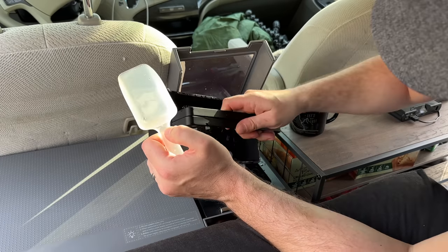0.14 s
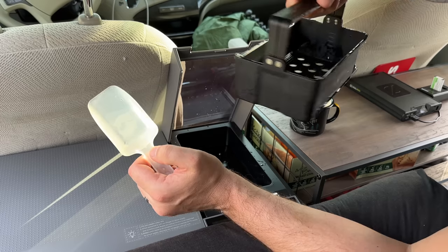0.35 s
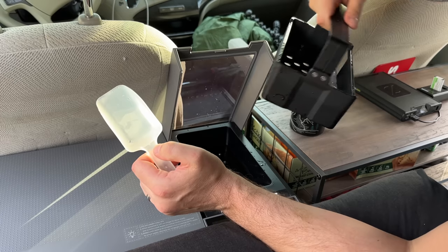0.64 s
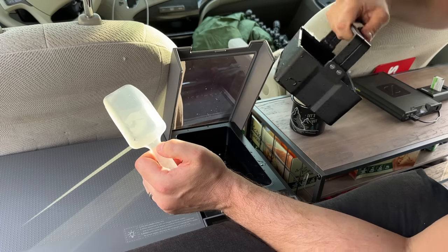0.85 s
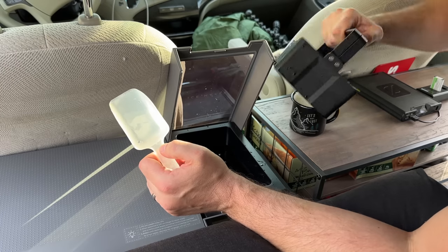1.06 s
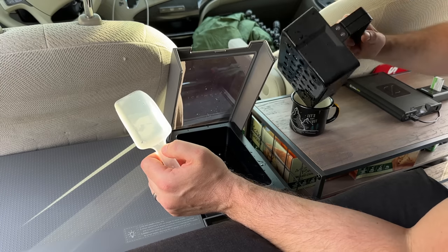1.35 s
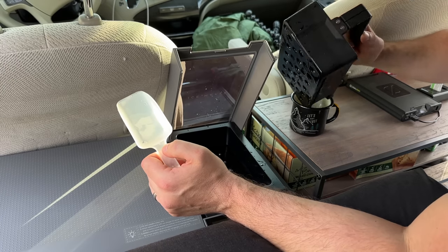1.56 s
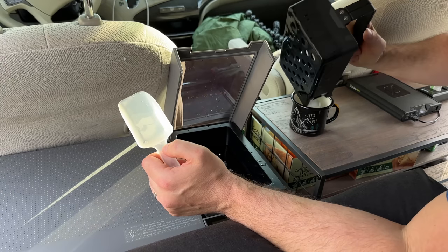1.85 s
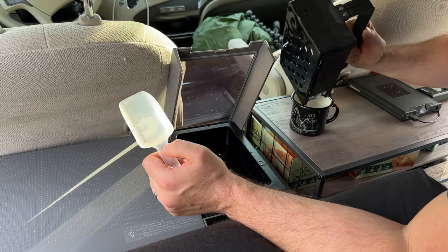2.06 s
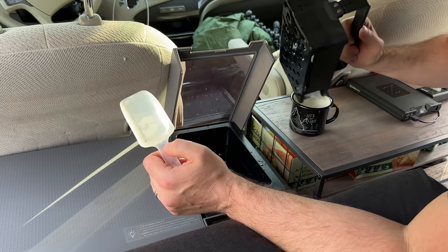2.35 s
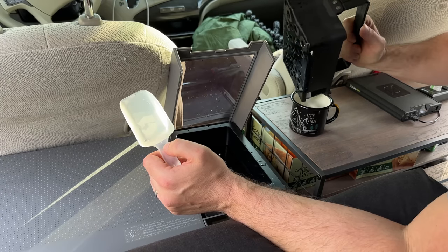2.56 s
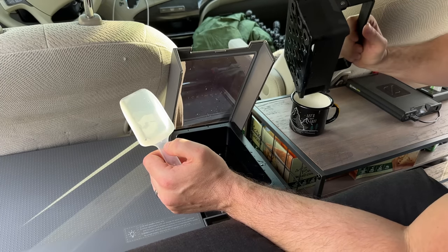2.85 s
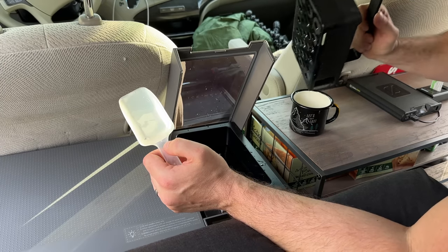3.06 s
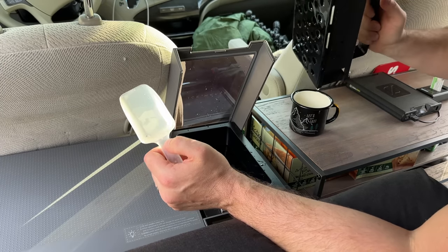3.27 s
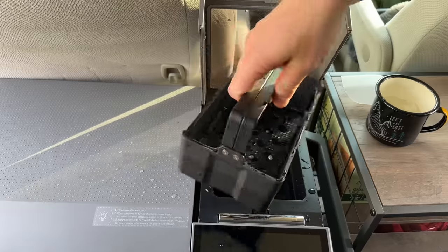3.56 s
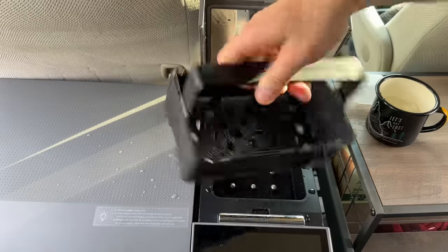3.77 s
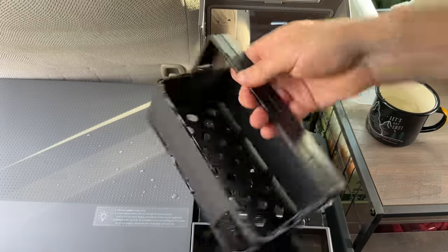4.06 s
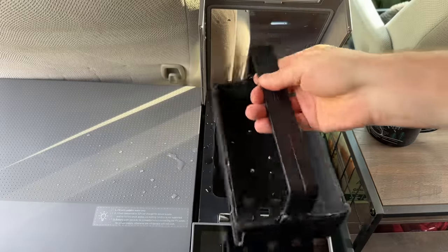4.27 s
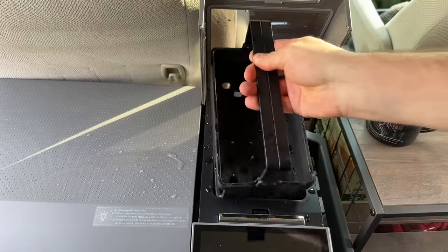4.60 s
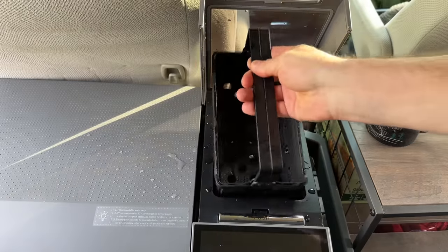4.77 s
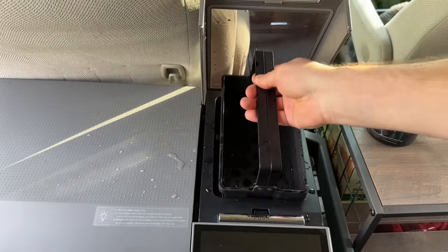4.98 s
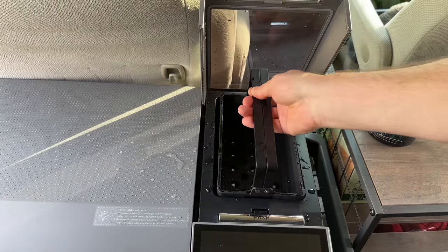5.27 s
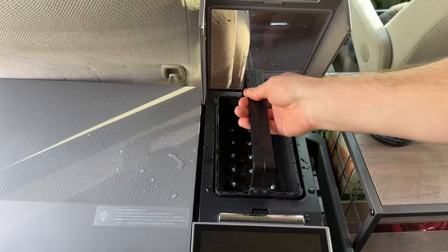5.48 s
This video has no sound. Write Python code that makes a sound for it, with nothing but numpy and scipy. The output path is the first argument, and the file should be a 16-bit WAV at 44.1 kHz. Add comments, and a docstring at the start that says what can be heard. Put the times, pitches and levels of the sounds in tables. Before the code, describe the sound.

Inside a small camper, close and dry, over a faint wavering hush, low hum and fine hiss. From 0 to 0.35 seconds ice cubes rattle and scrape in a plastic basket as it comes free with a soft thud; one more clack follows at 0.5. Low rumbling bumps jostle the microphone from 0.3 to 0.9, strongest near 0.85, with thin whistling in the hiss. Light shifts and a plastic tap come around 1.1. From 1.3 ice pours into a metal mug: dense, crunchy, bright clatter, loudest at 1.45 to 1.9, with a brief rim ring and short rising watery plops. It thins after 2.0, with a smaller tumble at 2.4 to 2.8. A quiet, faintly whistling hiss follows. At 3.7 the empty basket gives a sharp double clack; from 4.5 to 5.1 hollow knocks and a short rub settle it in its housing, then soft taps and a faint rustle end it.

```python
"""In a small camper, a plastic basket is lifted out of an ice maker and tipped over a metal mug.
Cubes shift, tumble and plop: contact noise is filtered by resonances, and trapped air rings as rising sines.
The empty basket then knocks its way back into the housing and sounds the ice maker's panels as damped sines.
Movement jostles the microphone in low bursts, over a faint hush of shaped noise, a low hum and a fine,
at times whistling hiss."""
import sys
import numpy as np
from scipy import signal
from scipy.fft import rfft, irfft
from scipy.io import wavfile
from scipy.ndimage import uniform_filter1d, minimum_filter1d

SR = 44100
rng = np.random.default_rng(int(sys.argv[2]) if len(sys.argv) > 2 else 0)


def unload_wav(signal):
    """Save mono or channel-first audio to the path in sys.argv[1] as 16-bit WAV at rate SR, clipped to [-1, 1]."""
    wavfile.write(
        sys.argv[1],
        SR,
        np.round(np.clip(np.atleast_2d(signal).T, -1, 1) * 32767).astype(np.int16),
    )


N = 248724
TIME = np.arange(N) / SR  # [s]

# cubes landing in the mug and on each other: (time [s], body level [dB], clack level [dB], tick level [dB])
DROPS = [(1.28, -23.5, -28, -39), (1.2858, -22.5, -28, -50), (1.3244, -30.5, -34, -40),
         (1.3582, -24.5, -29, -38), (1.4027, -17.5, -29.5, -35), (1.4116, -28, -25, -22),
         (1.4217, -20.5, -21.5, -34), (1.4312, -25, -42, -34), (1.4534, -11.5, -16, -18.5),
         (1.4738, -18.5, -22, -36), (1.5448, -20, -27, -39), (1.5832, -22, -21, -22),
         (1.5955, -16.5, -29, -35), (1.6191, -34, -39, -32), (1.6393, -16, -26, -26),
         (1.6615, -16.5, -23.5, -22.5), (1.6801, -19, -25.5, -33), (1.6959, -21, -40.5, -32),
         (1.7139, -23, -21.5, -29), (1.7407, -20.5, -29, -33.5), (1.7569, -34, -28, -35),
         (1.798, -19.5, -23.5, -37), (1.8204, -19, -21.5, -35), (1.8411, -23, -30, -27),
         (1.8507, -11, -12.5, -15.5), (1.9176, -25.5, -34.5, -49), (1.9336, -34, -39, -39),
         (2.0107, -19, -26.5, -28.5), (2.0422, -23.5, -23.5, -32), (2.152, -56, -42, -31),
         (2.1673, -24.5, -35, -41), (2.1946, -34, -30, -36.5), (2.2238, -33, -36.5, -56),
         (2.4014, -40, -33, -26), (2.4444, -25.5, -21.5, -30.5), (2.5314, -28.5, -28, -22.5),
         (2.5623, -21.5, -33, -23), (2.5663, -24.5, -22.5, -32), (2.5898, -25.5, -24.5, -28),
         (2.6083, -41, -26.5, -36), (2.6232, -31, -26, -37), (2.6926, -28, -25.5, -28.5),
         (2.7277, -27.5, -23, -33), (2.7343, -34, -22, -32), (2.8029, -45, -36, -44),
         (2.8203, -50, -33.5, -39.5)]
# cubes shifting in the basket: (time [s], body level [dB], clack level [dB], tick level [dB])
SHIFTS = [(0.0268, -23.5, -27.5, -35.5), (0.0572, -22.5, -28, -36), (0.0715, -24, -25.5, -39),
          (0.0793, -17.5, -19.5, -23.5), (0.0843, -25, -45, -28.5), (0.11, -21, -23, -47),
          (0.1837, -17.5, -23.5, -36), (0.2082, -21, -23, -36), (0.2152, -24, -33, -22),
          (0.3004, -24.5, -30, -42), (0.3431, -29, -31.5, -52), (0.5059, -24, -24, -30),
          (1.0597, -33.5, -46, -44.5), (1.1242, -33, -36, -42), (1.1829, -38, -46, -41.5),
          (1.2158, -30, -33.5, -47)]
# edges of the body, clack and tick bands of ice: (frequency [Hz])
ICE_BANDS_HZ = [700, 2200, 6000, 17000]
# strength of the ice sliding into the mug, before offsets: (time [s], body level [dB], clack level [dB])
POUR = [(1.25, -39, -56), (1.32, -34, -42), (1.39, -22.5, -39), (1.44, -52, -32), (1.51, -22.5, -36.5),
        (1.57, -24, -29.5), (1.6, -12, -20.5), (1.68, -19.5, -27.5), (1.76, -17.5, -26.5), (1.83, -28, -31),
        (1.89, -25, -34), (1.97, -39, -49), (2.06, -39, -45), (2.21, -37.5, -51), (2.37, -45, -59),
        (2.43, -30.5, -43), (2.51, -26.5, -34), (2.6, -42, -59), (2.68, -58, -70), (2.75, -35, -39),
        (2.85, -45, -49)]
# strength of the ice sliding in the basket, before offsets: (time [s], body level [dB], clack level [dB])
SCRAPE = [(0, -19, -34.5), (0.05, -26, -41), (0.1, -23, -29), (0.15, -23, -38), (0.2, -26, -37.5),
          (0.24, -38, -70), (0.38, -39, -52)]
# mean resonances of the mug: (frequency [Hz], width [Hz], level over the plain contact sound [dB])
MUG = [(1290, 57, 12), (1620, 51, 17.5), (1780, 54, 11.5), (1920, 110, 9.5), (2710, 200, 17.5),
       (3350, 400, 13), (10040, 880, 21.5), (13400, 1900, 13)]
# the mug's hollow, retuned and damped as ice gathers in it:
# (time [s], frequency [Hz], width [Hz], level over the plain contact sound [dB])
MUG_HOLLOW = [(1.9, 1072, 36, 22), (2.42, 1330, 45, 18), (2.66, 1100, 45, 13)]
# mean resonances of the basket: (frequency [Hz], width [Hz], level over the plain contact sound [dB])
BASKET = [(706, 150, 12), (1260, 98, 10.3), (1437, 59, 18), (1638, 140, 19), (3040, 930, 14.6),
          (9800, 740, 16), (13300, 1900, 6.1)]
# cubes that catch the rim: (time [s], level [dB])
RIM_HITS = [(1.585, -14.5), (1.674, -32)]
# ringing modes of the rim: (frequency [Hz], level relative to the hit [dB], 60 dB decay time [s])
RIM_MODES = [(5716, 0, .1), (5918, -1, .13), (6146, -3, .13), (6266, -5, .1), (13030, -6, .06)]
# air pockets in the wet bottom of the mug:
# (time [s], starting frequency [Hz], relative level [dB], 60 dB decay time [s], relative pitch rise [1/s])
PLOPS = [(1.409, 1040, -17, .06, 2), (1.546, 970, -17, .07, 5), (1.596, 990, -15, .06, 6),
         (1.641, 1010, -10, .06, 4), (1.663, 1040, -14, .07, 2), (1.887, 1020, -19, .07, 4),
         (2.080, 800, -33, .16, 10), (2.226, 1620, -26, .07, 1), (2.406, 1340, -25, .1, 2),
         (2.445, 2900, -19, .04, 2), (2.607, 1000, -15, .08, 14), (2.639, 940, -21, .11, 16),
         (2.755, 970, -25, .1, 8)]
# the basket bumping the mug and the housing:
# (time [s], thud level [dB], hollow level [dB], clack level [dB], tick level [dB])
KNOCKS = [(1.114, -33, -29, -23, -41), (2.2716, -31.5, -25.5, -18, -40.5),
          (3.6933, -23.5, -25, -16.5, -17.5), (3.7167, -20, -21.5, -19.5, -24),
          (3.7454, -30.5, -36, -32, -41), (4.5083, -30, -20.5, -26.5, -51), (4.6715, -24.5, -19, -17, -28),
          (4.7096, -18.5, -22, -20, -32), (4.7477, -25.5, -25.5, -29, -42), (4.7733, -28, -22, -26.5, -48),
          (4.8406, -18, -19, -17, -28.5), (4.89, -28, -28, -27, -48), (4.904, -24, -10.5, -19.5, -37.5),
          (4.9572, -34.5, -34, -36, -34), (5.0012, -32, -31, -40, -53), (5.0389, -27.5, -22.5, -34.5, -44),
          (5.089, -40, -29.5, -46, -53), (5.294, -34.5, -23.5, -29.5, -41), (5.3779, -36, -32, -34, -44.5),
          (5.5667, -31, -30.5, -32.5, -43.5)]
# edges of the thud, hollow, clack and tick bands of a knock: (frequency [Hz])
KNOCK_BANDS_HZ = [130, 450, 900, 2600, 17000]
# the basket's side rubbing down the housing, before offsets: (time [s], body level [dB], clack level [dB])
RUB = [(4.848, -34, -20.5), (4.875, -21, -37), (4.902, -35, -42)]
# mean resonances of the housing: (frequency [Hz], width [Hz], level over the plain contact sound [dB])
HOUSING = [(150, 26, 16), (235, 75, 22.2), (374, 98, 8.9), (591, 53, 21.3), (702, 79, 15.8),
           (1120, 220, 9.6), (1477, 22, 11), (1757, 54, 10.2), (2124, 42, 4.6), (3170, 86, 2.6),
           (10100, 990, 15.4), (13300, 2200, 10.8)]
# the basket coming free of its seat: (time [s], thud level [dB], hollow level [dB])
RELEASE = (0.075, -23, -32)
# mean modes of the ice maker's panels: (frequency [Hz], level relative to the blow [dB], 60 dB decay time [s])
PANELS = [(159.6, -7.5, 0.21), (246.4, 4, 0.14), (363.6, -10.5, 0.21), (610, -6, 0.056), (1146, -4.5, 0.04)]
# the hand shifting its grip on the basket, one list a stroke, before offsets:
# (time [s], body level [dB], clack level [dB])
GRIPS = [
    [(3.385, -53, -59), (3.42, -52, -47.5), (3.47, -57, -66)],
    [(5.3, -56, -58), (5.345, -54, -45), (5.39, -58, -60)],
    [(5.55, -41, -59), (5.6, -50, -50), (5.64, -43, -43)],
]
# low swings and case rattles that make up the jolts of the microphone:
# (time [s], frequency [Hz], relative level [dB])
JOLTS = [(0.305, 69, -15), (.456, 73, -11), (.483, 93, -14), (0.511, 316, -17.5), (.521, 98, -12),
         (0.534, 80.6, -11), (0.607, 69.6, -14.5), (0.714, 66, -15.5), (0.764, 240, -26.5),
         (.769, 101, -13.5), (0.804, 70, -11.5), (.822, 358, -18), (0.829, 184, -6.5), (0.844, 95, -4),
         (.849, 227, -12), (0.894, 82.5, -11), (3.428, 47.7, -20), (3.878, 58.5, -21), (4.62, 66, -16),
         (5.406, 51.4, -15.5)]
# the rumble between jolts, before its ceiling and offset: (time [s], level [dB])
SWAY = [(0.0, -37.5), (0.16, -32.5), (0.3, -12), (0.38, -20.5), (0.52, -15), (0.66, -20), (0.85, -4),
        (0.99, -26.5), (1.07, -22), (1.27, -55), (1.95, -72), (2.42, -25), (2.48, -41.5), (3.35, -35.5),
        (3.53, -29), (3.71, -23.5), (3.8, -30.5), (4.19, -28.5), (4.24, -38), (4.55, -30), (4.62, -22.5),
        (4.74, -31), (5.34, -27.5), (5.4, -18.5), (5.56, -32), (5.64, -21)]
# spectrum of that rumble: (frequency [Hz], relative level [dB])
SWAY_COLOUR = [(12, -40), (20, -18), (44, -10.5), (70, -4), (93, -12), (211, -26.5), (390, -51),
               (660, -120)]
# a fine hiss, probably refrigerant in the tubing, before its wavering: (time [s], level [dB])
HISS = [(.78, -57.5), (.88, -66), (1.05, -57.5), (3.55, -54), (4.4, -59.5), (5.1, -52.5)]
# spectrum of the hiss: (frequency [Hz], relative level [dB])
HISS_COLOUR = [(3500, -3), (9800, 0), (14500, -7)]
# thin whistles in the hiss, one list each, before flicker: (time [s], frequency [Hz], level [dB])
WHISTLES = [
    [(.66, 8800, -66), (.71, 9250, -56), (.77, 8680, -57), (.825, 9800, -49), (.88, 8700, -66),
     (.932, 9600, -61), (.99, 8450, -68)],
    [(2.82, 10600, -55), (2.92, 9200, -64), (3.05, 10050, -53), (3.22, 8450, -63), (3.33, 9080, -58),
     (3.385, 7950, -66)],
    [(4.96, 11400, -64), (5.5, 9500, -65)],
]
# the background, before its wavering: (time [s], level [dB])
HUSH = [(.75, -39), (.88, -48.5), (1.05, -40.5), (1.95, -46), (2.4, -41), (3.6, -40), (3.8, -47),
        (4.3, -41), (5.64, -38.5)]
# spectrum of the background: (frequency [Hz], relative level [dB])
HUSH_COLOUR = [(100, -12), (320, -14), (700, -22.5), (1050, -20), (1760, -25), (3000, -34), (7000, -55)]

# share of the sound that differs between the two microphone ports; for contacts, near 1.5 kHz
ICE_SIDE, PLASTIC_SIDE, RUMBLE_SIDE = .58, .42, .3
# gain control: threshold, compression ratio and recovery
LIMIT_DB, RATIO, RECOVERY_DB_PER_S = -4.5, 1.68, 12.5
TOP_HZ = 16000


def ice_in_mug():
    """Impact excitation of a cavity: tumbling cubes sound the mug's metal and its hollow."""
    slides = sliding(POUR, per_s=140, body_db=-9, clack_db=-6.0, tick_db=-14.5)
    rows = list(DROPS) + list(slides)
    return pan(0.39) * blows(
        rows, ICE_BANDS_HZ, mug_modes, corner_hz=6300, snap_db=12, scatter_s=0.004,
        cabin_db=-9.5, cabin_t60=0.096, side=ICE_SIDE, damping=0.3, own_db=12, rise_s=0.00067)


def mug_modes(s):
    """Loading of a resonator: the hollow's mode moves as the mug fills, while the metal's modes stay."""
    hollow = [curve(MUG_HOLLOW, s, axis=k) for k in range(1, 4)]
    return [hollow] + list(MUG)


def ice_in_basket():
    """Impact excitation of a thin shell: cubes jostle against plastic as the basket comes out."""
    slides = sliding(SCRAPE, per_s=150, body_db=-9, clack_db=0.5, tick_db=-10.5)
    rows = list(SHIFTS) + list(slides)
    return pan(0.92) * blows(
        rows, ICE_BANDS_HZ, lambda s: BASKET, corner_hz=4870, snap_db=15.5, scatter_s=0.0084,
        cabin_db=-8.5, cabin_t60=0.091, side=ICE_SIDE, damping=0.36, own_db=9.0)


def crunch(crunch_db=-15, grain_db=7):
    """Friction of rough faces: grinding ice gives dense, bright noise with rapid random level changes."""
    noise = coloured([(2500, 0), (15000, -4)], ICE_SIDE)
    grains = unit(noise * undb(grain_db * walk(per_s=800)))
    pouring = (TIME > POUR[0][0]) & (TIME < POUR[-1][0])
    return grains * undb(curve(POUR, axis=2) + crunch_db) * pouring


def rim():
    """Beating of close metal modes: they ring briefly, reaching the two ports in different phases."""
    out, t = np.zeros((2, N)), np.arange(SR // 4) / SR
    for s, hit_db in RIM_HITS:
        for hz, db, t60 in RIM_MODES:
            phase = rng.uniform(0, 2 * np.pi) + rng.uniform(-1, 1, size=(2, 1))
            decay = undb(hit_db + db - 60 * t / t60)
            add(out, s, decay * np.sin(2 * np.pi * hz * t + phase))
    return out


def plops(swell_s=0.00057, lag=0.87, big_db=2, small_db=-30, small_hz=1900, small_t60=0.016, small_rise=5):
    """Bubble resonance: trapped air climbs in pitch nearing the surface; the last cubes stir up small bubbles."""
    out, t = np.zeros((2, N)), np.arange(SR // 6) / SR
    # a bubble swells quickly and bursts within a few hundredths of a second
    burst = np.exp(-(t / .024) ** 4)
    life = (1 - np.exp(-t / swell_s)) * burst
    bubbles = [(s, hz, db + big_db, t60, rise) for s, hz, db, t60, rise in PLOPS]
    for when, fine, force in rng.random(size=(30, 3)):
        level_db = small_db + 10 * (force - .5)
        bubbles.append((2.42 + .38 * when, small_hz * 2.4 ** fine, level_db, small_t60, small_rise))
    for s, hz, db, t60, rise in bubbles:
        phase = 2 * np.pi * hz * (t + rise * t ** 2 / 2)
        decay = undb(db - 60 * t / t60)
        add(out, s, life * decay * np.sin([phase, phase + lag]))  # lag [rad] between the ports
    return out


def basket_knocks():
    """Impact and friction on a hollow body: the basket bumps the mug, then bounces and rubs in the housing."""
    plastic = dict(corner_hz=5100, slope=2.8, snap_db=9.5, scatter_s=0.0063, cabin_db=-13, cabin_t60=0.12,
                   side=PLASTIC_SIDE, damping=0.21, own_db=4)
    rub_rows = sliding(RUB, per_s=150, body_db=-13, clack_db=-8.0, tick_db=-27)
    knocks = blows(KNOCKS, KNOCK_BANDS_HZ, lambda s: HOUSING, size=8192, **plastic)
    rub = blows(rub_rows, ICE_BANDS_HZ, lambda s: HOUSING, **plastic)
    return pan(1.6) * (knocks + rub)


def cabinet(drive_db=-1):
    """Modal ringing of panels: thuds drive the low modes, which swell slowly, hollow blows the higher ones."""
    out, t = np.zeros((2, N)), np.arange(SR // 4) / SR
    for s, thud_db, hollow_db, *_ in [RELEASE] + list(KNOCKS):
        for hz, db, t60 in PANELS:
            blow_db = thud_db if hz < KNOCK_BANDS_HZ[1] else hollow_db
            turns = hz * t * (1 + .03 * rng.standard_normal())
            swell = 1 - np.exp(-turns ** 2)
            decay = undb(blow_db + drive_db + db - 60 * t / t60)
            add(out, s, swell * decay * np.sin(2 * np.pi * turns))
    return pan(3) * out


def grip():
    """Granular friction: fingers and wet plastic rustle in fine, bright grains."""
    rows = []
    for stroke in GRIPS:
        rows.extend(sliding(stroke, per_s=160, body_db=-12, clack_db=-9, tick_db=-3.0))
    return blows(
        rows, ICE_BANDS_HZ, lambda s: BASKET, corner_hz=12000, snap_db=10, scatter_s=0.0046,
        cabin_db=-14, cabin_t60=.08, side=PLASTIC_SIDE, damping=.2, own_db=13)


def handling(cycles=0.57, jolt_db=5.5, sway_db=-3):
    """Inertial excitation: movement shakes the microphone, a low rumble with brief swings and case rattles."""
    rumble = coloured(SWAY_COLOUR, side=RUMBLE_SIDE)
    # the shaking keeps an even strength from swing to swing
    power = uniform_filter1d(np.mean(rumble ** 2, axis=0), SR // 14)
    out = rumble / np.sqrt(power) * undb(np.minimum(curve(SWAY), -21) + sway_db)
    for s, hz, db in JOLTS:
        near = np.abs(TIME - s) < .1
        turns = (TIME[near] - s) * hz
        skew = rng.uniform(-.4, .4, size=(2, 1))  # phase at each port [rad]
        bell = np.exp(-(turns / cycles) ** 2)
        out[:, near] += undb(db + jolt_db) * bell * np.sin(2 * np.pi * turns + skew)
    return out


def hiss(wobble_hz=45, flicker_db=3):
    """Broadband and tonal noise: a fine hiss swells and sinks, at times joined by a thin, wandering whistle."""
    out = coloured(HISS_COLOUR, side=.82) * undb(curve(HISS) + walk(per_s=20))
    for rows in WHISTLES:
        hz = uniform_filter1d(curve(rows), size=SR // 35) + wobble_hz * walk(per_s=400)
        phase = 2 * np.pi * np.cumsum(hz) / SR
        sounding = (TIME > rows[0][0]) & (TIME < rows[-1][0])
        level = undb(curve(rows, axis=2) + flicker_db * walk(per_s=90))
        out += np.sqrt(2) * sounding * level * np.sin(phase)  # root 2 makes the level an rms
    return out


def hush(waver_db=2.0, hum_hz=75, hum_db=-55):
    """Stationary noise with slow modulation: the cabin's faint background and a low hum waver together."""
    waver = walk(per_s=7)
    hum = undb(hum_db + 2 * waver) * np.sin(2 * np.pi * hum_hz * TIME)
    return coloured(HUSH_COLOUR, side=0.75) * undb(curve(HUSH) + waver_db * waver) + hum


def sliding(rows, per_s, body_db, clack_db, tick_db):
    """Friction as many small impacts: random contacts whose strength follows the sliding motion."""
    start, end = rows[0][0], rows[-1][0]
    count = int((end - start) * per_s)
    place, force, hardness = rng.random((count, 3)).T
    s = start + (np.arange(count) + place) / per_s
    force_db, hard_db = 7 * (force - .5), 10 * (hardness - .5)
    low = curve(rows, s) + force_db
    high = curve(rows, s, axis=2) + force_db
    return np.transpose([s, low + body_db, high + clack_db, high + tick_db + hard_db])


def blows(rows, edges, modes_at, corner_hz, snap_db, scatter_s, cabin_db, cabin_t60, side, damping, own_db,
          slope=1, rise_s=0.0003, size=4096):
    """Impact and reflection: a snap, a spray from near surfaces and a cabin tail, coloured by the object."""
    out, t = np.zeros((2, N)), np.arange(size) / SR
    pairs = np.transpose([edges[:-1], edges[1:]])
    impulse = signal.unit_impulse(size)
    filters = [signal.butter(3, pair, "band", fs=SR, output="sos") for pair in pairs]
    bands = np.array([rfft(signal.sosfilt(sos, impulse)) for sos in filters])[:, None]
    # short waves die sooner and differ more between the two ports
    height = np.sqrt(pairs.prod(axis=1))[:, None, None] / 1500
    age = t * height ** damping
    width = side * height ** .2
    spray, tail = np.exp(-age / scatter_s), undb(cabin_db - 60 * age / cabin_t60)
    fade = (1 - np.exp(-t / rise_s)) * (spray + tail)
    attack = SR // 100  # the levels hold over the first 10 ms
    for s, *levels in rows:
        mid, diff = rng.standard_normal((2, size))
        contact = fade * (mid + width * diff * np.array([[1], [-1]]))
        # rough faces chatter, touching several times within a few milliseconds
        contact *= undb(3.5 * np.repeat(rng.standard_normal(size // 32), 32))
        contact[..., 0] += undb(snap_db)
        # each struck piece adds a few brief resonances of its own
        own = [(hz, hz / 40 * (1 + hz / 5000), own_db) for hz in 1300 * 11 ** rng.random(size=8)]
        response = body(list(modes_at(s)) + own, corner_hz, slope, size)
        parts = irfft(rfft(contact) * response * bands)
        # each contact's bands are set to the levels in its row
        gains = undb(levels) / parts[..., :attack].std(axis=(1, 2))
        add(out, s, np.tensordot(gains, parts, 1))
    return out


def body(modes, corner_hz, slope, size):
    """Causal response of a resonant object; each blow meets its resonances a little differently."""
    f = np.arange(size // 2 + 1) * SR / size
    hz, width, db = np.transpose(modes)[:, :, None]
    hz = hz * (1 + .012 * rng.standard_normal(hz.shape))
    db = db + 2.1 * rng.standard_normal(hz.shape)
    peaks = np.sum(undb(db) ** 2 / (1 + (2 * (f - hz) / width) ** 2), axis=0)
    power = (1 + peaks) / (1 + (f / corner_hz) ** 2) ** slope
    # folding the cepstrum onto positive time gives minimum phase
    cepstrum = irfft(np.log(power) / 2)
    cepstrum[1:size // 2] *= 2
    cepstrum[size // 2 + 1:] = 0
    return np.exp(rfft(cepstrum))


def coloured(points, side):
    """Filtered noise: steady, in stereo, with a given spectrum."""
    return tint(stereo_noise(N, side), points)


def stereo_noise(size, side):
    """Partial coherence: two channels of noise; side sets how much they differ."""
    mid, diff = rng.standard_normal((2, size))
    return np.array([mid + side * diff, mid - side * diff]) / np.sqrt(1 + side ** 2)


def tint(x, points):
    """Spectral shaping: a given spectrum with steep skirts, at rms 1."""
    hz, db = np.transpose(points)
    f = np.arange(N // 2 + 1) * SR / N + 1  # 1 Hz up, to keep off zero
    skirts = 1 / np.sqrt(1 + (hz[0] / f) ** 6 + (f / hz[-1]) ** 6)
    shape = undb(np.interp(np.log(f), np.log(hz), db))
    return unit(irfft(rfft(x) * skirts * shape, N))


def walk(per_s):
    """Random modulation: a value that moves to a new random point per_s times a second."""
    steps = rng.standard_normal(int(TIME[-1] * per_s) + 2)
    return np.interp(TIME * per_s, np.arange(len(steps)), steps)


def curve(rows, at=TIME, axis=1):
    """Linear interpolation of one column of a table."""
    rows = np.asarray(rows)
    return np.interp(at, rows[:, 0], rows[:, axis])


def undb(db):
    """Logarithmic level: decibels to amplitude gain."""
    return 10 ** (np.asarray(db) / 20)


def unit(x):
    """Normalisation to rms 1."""
    return x / np.sqrt(np.mean(x ** 2))


def pan(db):
    """Level difference between channels: gains for a left-minus-right level."""
    return undb(np.array([[db], [-db]]) / 2)


def add(out, s, sound):
    """Superposition: mix a sound into out, starting at s seconds."""
    i = int(np.clip(s * SR, 0, N - 1))
    out[:, i:i + sound.shape[-1]] += sound[..., :N - i]


def scene():
    """Superposition of the ice, the plastic, the handling and the background."""
    ice = ice_in_mug() + ice_in_basket() + crunch() + rim() + plops()
    plastic = basket_knocks() + cabinet() + grip()
    return ice + plastic + handling() + hiss() + hush()


def gain_control(x):
    """Dynamic compression: turn down at once for loud peaks and recover slowly."""
    peak_db = 20 * np.log10(np.abs(x).max(axis=0) + 1e-9)
    over_db = np.maximum(peak_db - LIMIT_DB, 0)
    recovered = RECOVERY_DB_PER_S * TIME
    cut_db = np.maximum.accumulate(over_db * (1 - 1 / RATIO) + recovered) - recovered
    # hold and smooth the gain over about 3 ms
    held = minimum_filter1d(undb(-cut_db), size=SR // 300)
    return x * uniform_filter1d(held, size=SR // 300)


def record(dry):
    """Limits of the receiver: gain control, clipping at full scale and a steep cut of the top."""
    clipped = np.clip(gain_control(dry), -1, 1)
    low_pass = signal.ellip(8, .2, 70, TOP_HZ, fs=SR, output="sos")
    return signal.sosfilt(low_pass, clipped)


dry = scene()
out = record(dry)
unload_wav(out)
```